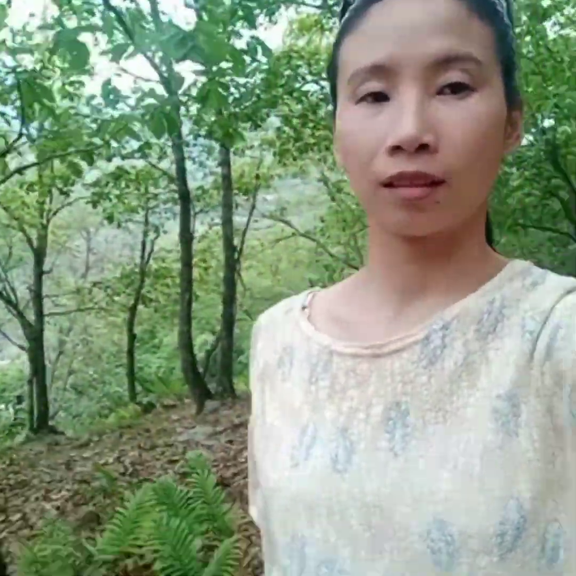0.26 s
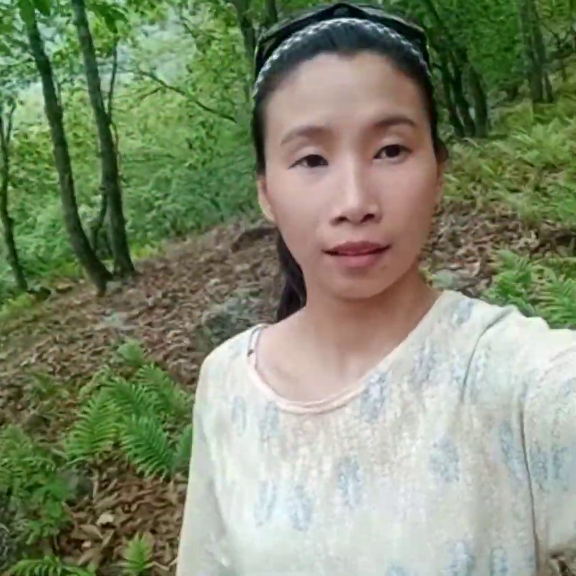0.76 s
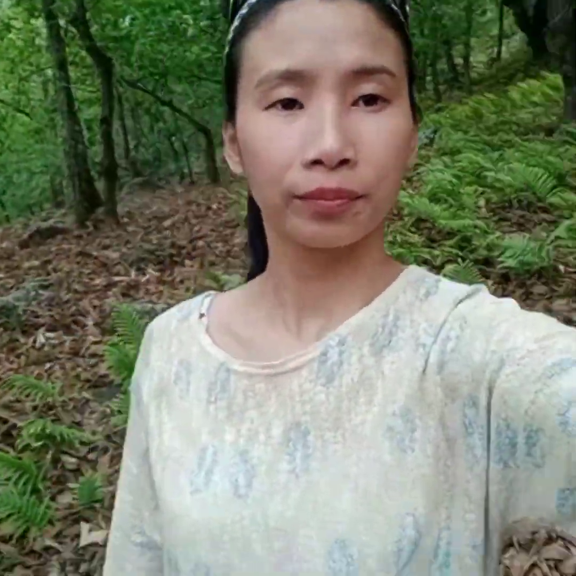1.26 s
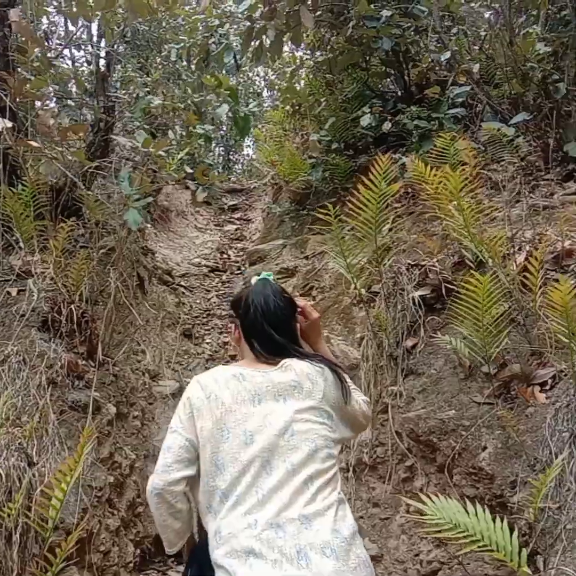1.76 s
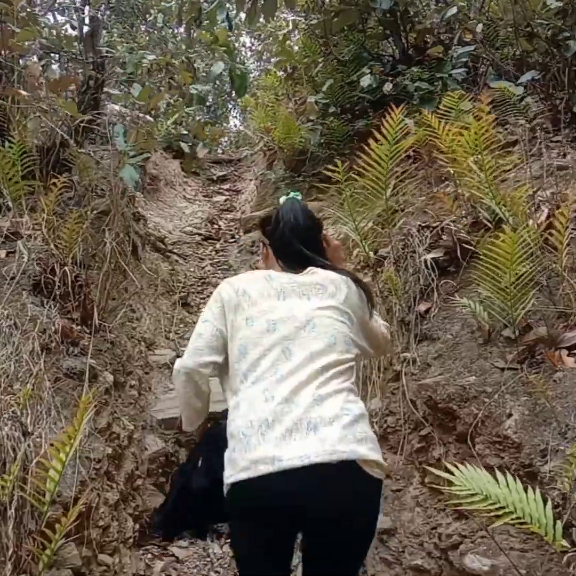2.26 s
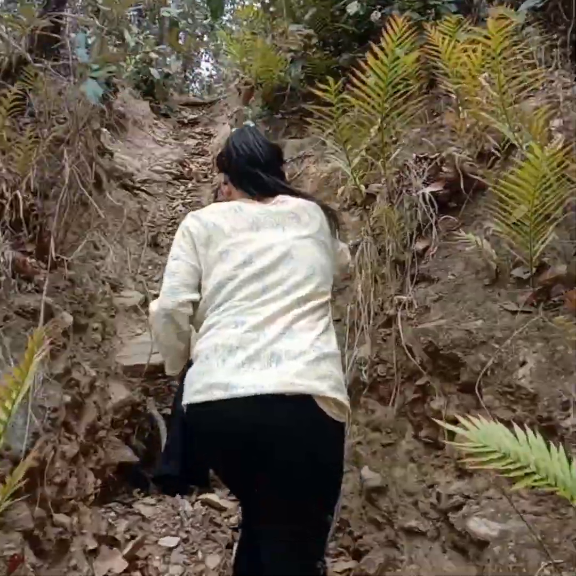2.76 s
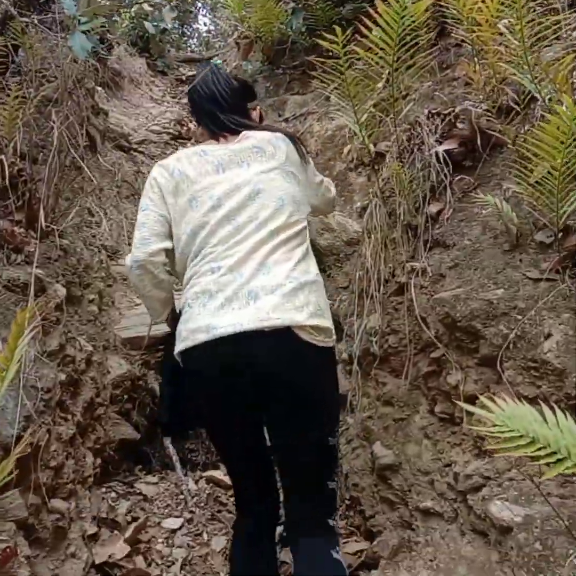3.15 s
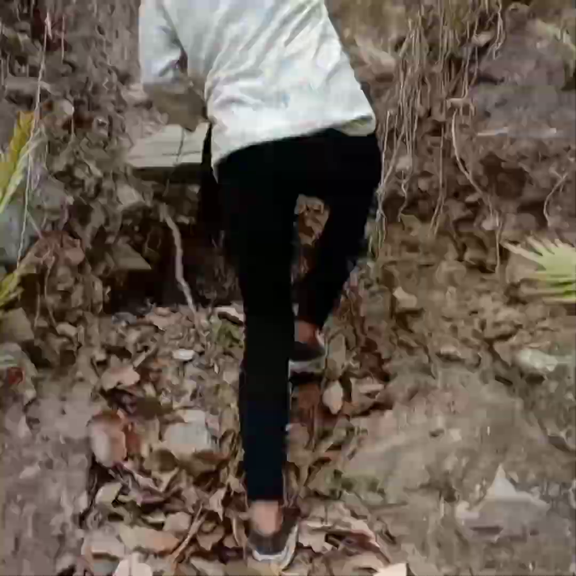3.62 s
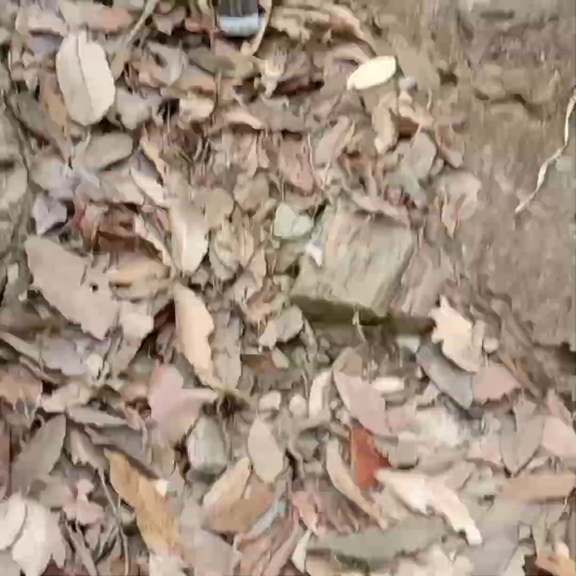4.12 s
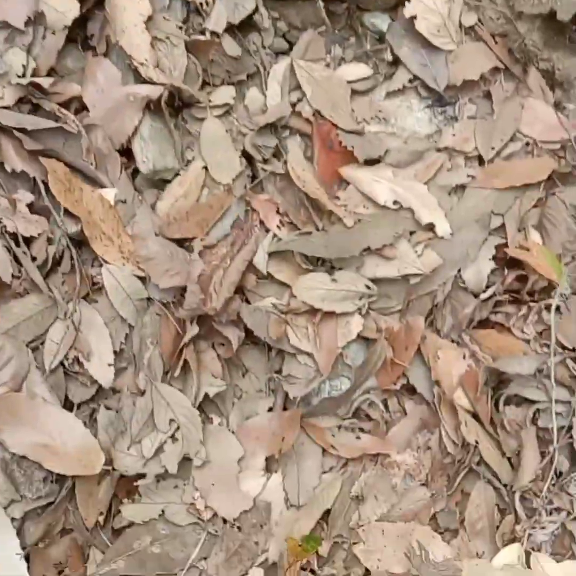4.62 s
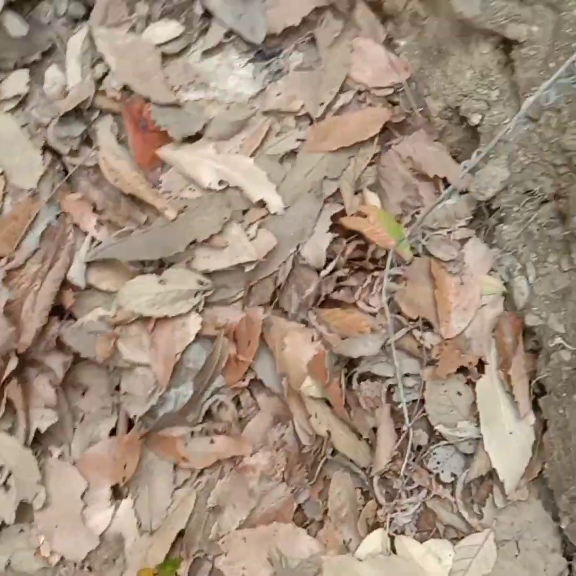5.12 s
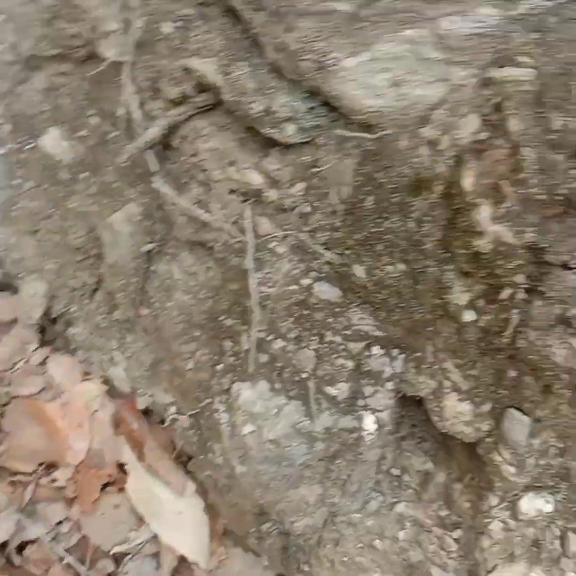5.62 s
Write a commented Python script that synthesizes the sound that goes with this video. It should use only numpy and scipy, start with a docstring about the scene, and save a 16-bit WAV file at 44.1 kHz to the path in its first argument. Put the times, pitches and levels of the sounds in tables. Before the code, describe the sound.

On a stony, leafy slope, each tread is a swarm of tiny dry cracks topped by single leaf snaps. After a momentary dropout the steps are faint, then crunchy again. Soft thuds bump the hand-held handset in the second half, its shell ringing dully over a faint lumpy rumble. Close, dry, mono sound.

```python
"""Feet crunch through dry leaves and grit on a stony hillside path, close to a hand-held mono microphone.
From the start each crush is a swarm of tiny cracks, and single leaves snap over it, hardest near 1.1 s.
The sound drops out for a moment after 1.7 s; quiet steps follow, and the crunch is full again by 2.4 s.
Low knocks, blows with a push of about one cycle, strike the handset, hardest near 3.7 s and again at 5.5 s.
Throughout, its shell rings near 1.3 kHz as the grit shakes it, over a lumpy low rumble of hand and ground."""
import sys
import numpy as np
from scipy import signal
from scipy.io import wavfile

SR = 44100
rng = np.random.default_rng(int(sys.argv[2]) if len(sys.argv) > 2 else 0)


def output_pcm(signal):
    """Save a mono or channel-first signal as 16-bit PCM at the path in sys.argv[1].

    Samples are clipped to [-1, 1] before scaling.
    """
    pcm = np.clip(np.atleast_2d(signal).T, -1, 1) * 32767
    wavfile.write(sys.argv[1], SR, np.round(pcm).astype(np.int16))


N = 259308

# leaves that give way at once: (time [s], crack peak [dB], centre [Hz])
LEAF_SNAPS = [(0.256, -32, 2300), (0.311, -23.5, 4100), (0.5022, -22.5, 3900), (0.611, -19, 3400),
              (1.0100, -19, 3670), (1.1453, -7.5, 4000), (1.2106, -23, 3990), (1.2200, -17.5, 4500),
              (1.2290, -16, 4750), (1.3815, -16, 2600), (1.4303, -13.5, 2970), (1.5747, -32, 2350),
              (1.856, -35.5, 10600), (2.318, -27, 5500), (2.419, -20, 3600), (2.609, -23, 4563),
              (2.7223, -23.5, 2080), (3.3677, -30, 3258), (3.6423, -17, 3103), (3.657, -19, 3300),
              (3.694, -19.5, 3010), (3.7255, -41, 3630), (3.7268, -20, 1942), (3.9286, -21, 4900),
              (4.0438, -18, 2850), (4.08, -19.5, 2650), (4.1070, -11.5, 5420), (4.1772, -15, 5500),
              (4.208, -19, 2900), (4.5533, -29, 2398), (4.5677, -21, 2380), (4.683, -24.5, 3223),
              (4.792, -15.5, 3240), (4.806, -17, 2700), (4.8199, -12, 2270), (5.0907, -30, 5030),
              (5.4277, -20.5, 3512), (5.5101, -22, 3320), (5.691, -30, 2670)]
# ringing modes of the handset's shell: (pitch [Hz], level [dB], 60 dB decay time [s])
SHELL_MODES = [(1270, -0.5, 0.031), (616, -6.5, 0.0081), (228, -15, 0.092)]


def from_db(db):
    """Amplitude factor of a level in dB."""
    return 10 ** (np.asarray(db) / 20)


def rms_one(x):
    """The signal scaled to an rms of 1."""
    return x / np.sqrt(np.mean(x ** 2) + 1e-20)


def at_hz(points, hz):
    """Level of a spectrum at one frequency, in straight lines over log frequency."""
    point_hz, point_db = np.array(points).T
    return np.interp(np.log(hz), np.log(point_hz), point_db)


def drift(rate_hz):
    """Slow chance: noise at every 20th sample through a double one-pole low-pass; rms 1."""
    r = np.exp(-2 * np.pi * rate_hz * 20 / SR)
    noise = rng.standard_normal(N // 20 + 2002)
    slow = signal.lfilter([1], [1, -2 * r, r * r], noise)[2000:]   # without the filter's start
    return np.interp(np.arange(N) / 20, np.arange(len(slow)), rms_one(slow))


def ring(clicks, hz, t60):
    """A resonance: a unit click sets off a decaying sine that starts at height 1."""
    r, w = from_db(-60 / (t60 * SR)), 2 * np.pi * hz / SR
    return signal.lfilter([0, np.sin(w)], [1, -2 * r * np.cos(w), r * r], clicks + 1e-18)


def crackle(per_s, spread_db, clumps_per_s, clump_s, calm):
    """Samples and signed sizes of tiny cracks, and their bustle: they swarm as a leaf gives, then thin out."""
    gives = (rng.random(N) < clumps_per_s / SR) * np.minimum(rng.exponential(1, N), 2)
    clumps = signal.lfilter([1], [1, -np.exp(-1 / (clump_s * SR))], gives)
    swarm = (calm + clumps) / (calm + clumps_per_s * clump_s)   # calm: the even share of the cracks
    at = np.flatnonzero(rng.random(N) < per_s * swarm / SR)
    sizes_db = spread_db * np.minimum(rng.exponential(1, len(at)), 3)
    sizes = from_db(sizes_db) * rng.choice([-1, 1], len(at))
    return at, sizes, rms_one(np.sqrt(swarm))


def coloured(cracks, spectrum, low_hz, high_hz, colour_db, hiss, patchy_db):
    """Narrow bands: every crack has a colour of its own, over noise that follows the bustle; rms 1."""
    at, sizes, bustle = cracks
    bands = round(5 * np.log2(high_hz / low_hz))
    edges = np.geomspace(low_hz, high_hz, bands + 1)
    out = 0
    for low, high in zip(edges, edges[1:]):
        push = np.zeros(N)
        push[at] = sizes * from_db(colour_db * rng.uniform(-0.7, 1, len(at)))
        push = rms_one(push) + hiss * bustle * rng.standard_normal(N)
        patches_db = patchy_db * (drift(21.3) + 1.2 * drift(2.6))
        gain = from_db(at_hz(spectrum, np.sqrt(low * high)) + patches_db)
        band = signal.butter(2, [low, high], "band", fs=SR, output="sos")
        out = out + gain * signal.sosfilt(band, push)
    return rms_one(out)


def tread(gains):
    """Feet in the litter: one stream of cracks drives the crunch, its treble, the grit and the shell."""
    # colour of the crushed leaves: (frequency [Hz], level [dB per Hz])
    leaves = [(300, -12), (500, -3.5), (1000, -7), (1600, -5), (2600, 3), (4500, 0), (7000, 0),
              (10000, -19), (13000, -41.5), (16000, -7)]
    tick_colour = [(4000, 6.0), (16000, -14)]   # (frequency [Hz], level [dB per Hz])
    ticks_db = -9.5   # lone twig and leaf-edge ticks, relative to the crisp band
    flutter_db, flutter_hz = 2, 18   # the grip on the shell comes and goes
    grip_db = 7.5   # rubbing of the hand on the shell, relative to the grit that shakes it

    body_gain, crunch_gain, grit_gain, ring_gain, brittle_gain, crisp_gain, fizz_gain = gains
    jump = np.hypot(1, crumbling() / crunch_gain)
    calm = 0.22 + 16.0 * crunch_gain   # a heavy crush is more even, its cracks less clumped
    cracks = crackle(per_s=3600.0, spread_db=4.0, clumps_per_s=110.0, clump_s=0.003, calm=calm)
    body = coloured(cracks, leaves, 1440, 2398, colour_db=4.5, hiss=0.43, patchy_db=2.0)
    crunch = coloured(cracks, leaves, 2313, 4970, colour_db=7.0, hiss=0.57, patchy_db=1.0)
    grit = coloured(cracks, leaves, 289.4, 1403, colour_db=3.5, hiss=0.74, patchy_db=3.5)
    brittle = coloured(cracks, leaves, 4940, 7480, colour_db=9.0, hiss=0.48, patchy_db=2.0)
    crisp = coloured(cracks, leaves, 7500, 13500, colour_db=27.0, hiss=0.96, patchy_db=3.0)
    fizz = coloured(cracks, leaves, 13500, 17000, colour_db=3.0, hiss=0.8, patchy_db=1.5)

    lone = crackle(per_s=39.0, spread_db=3.0, clumps_per_s=8.7, clump_s=0.045, calm=0.49)
    ticks = coloured(lone, tick_colour, 3524, 16500, colour_db=1.5, hiss=0.01, patchy_db=1.5)
    crisp_and_ticks = crisp + from_db(ticks_db) * ticks
    treble = brittle_gain * brittle + crisp_gain * crisp_and_ticks + fizz_gain * fizz
    litter = body_gain * body + crunch_gain * crunch + treble + grit_gain * grit

    bustle = cracks[2]
    rubbing = from_db(grip_db) * bustle * rng.standard_normal(N)
    flutter = from_db(flutter_db * drift(flutter_hz))
    shaking = ring_gain * flutter * (grit + rubbing)
    main_hz, _, main_t60 = SHELL_MODES[0]
    return jump * litter + ring(shaking, main_hz, main_t60)


def layers():
    """Gains of the layers: a foot's weight builds up, holds and settles, in dB, over the rest level."""
    # a foot crushes or drags the litter: (full weight at [s], held [s], build-up [s], settling [s],
    # crunch [dB], then relative to the crunch: grit [dB], shell drive [dB], brittle 5-8 kHz [dB],
    # crisp band above [dB])
    crushes = [(0.0, 0.06, .05, 0.13, -40.5, -26, -37.5, 0.5, -4.5),
               (.27, 0.051, 0.079, 0.18, -45.5, -32, -39, -3, -13),
               (0.384, 0.025, 0.097, 0.056, -36, -23, -41.5, 4, 2),
               (.505, 0.022, 0.18, 0.13, -40.5, -43, -45, 0, -6),
               (0.617, 0.043, 0.13, 0.11, -33, -28, -40.5, 2, 1),
               (1.011, 0.031, 0.016, 0.078, -35.5, -15, -54.5, -1, -2),
               (1.057, 0.129, 0.061, 0.06, -27, -17, -42, -1, -1),
               (1.253, 0.05, 0.06, 0.12, -29, -15.5, -40, 0, -1),
               (1.383, 0.08, 0.074, .12, -25.5, -21, -49, -0.5, -4.5),
               (1.58, 0.16, 0.02, 0.016, -29.5, -20, -43, 0, -4.5),
               (2.1, 0.036, 0.15, 0.089, -54.5, -4, -29, 7.5, -7),
               (2.229, 0.0078, 0.12, 0.088, -55, -6, -23.5, 11, -17),
               (2.37, 0.03, 0.1135, 0.12, -39.5, -13, -46, 0, -1),
               (2.43, 0.04, 0.047, 0.085, -32.5, -5.5, -34.5, 0.5, 0.5),
               (2.625, 0.03, 0.11, 0.15, -35.5, -6.5, -30.5, 3.5, -2.5),
               (2.82, 0.032, 0.19, 0.084, -43.5, -18, -28.5, -1.5, -9),
               (3.002, 0.044, 0.34, 0.17, -43, -16, -31, -0.5, -6),
               (3.195, 0.044, 0.053, 0.11, -52, -21.5, -23.5, 12, -2),
               (3.43, 0.062, 0.074, 0.22, -33, -11.5, -37.5, -0.5, -5.5),
               (3.646, 0.054, 0.099, 0.027, -34.5, -6, -40, 0.5, -6.5),
               (3.809, 0.06, 0.067, 0.083, -34.5, -8, -32, -1.5, -4.5),
               (3.932, 0.095, 0.084, 0.039, -38, -2, -31, -1.5, -6.5),
               (4.06, 0.16, 0.052, 0.023, -33.5, -19, -41.5, 2.5, -3.5),
               (4.27, 0.114, 0.58, 0.12, -40.5, -35, -49.5, -1, -12),
               (4.42, .17, 0.25, 0.15, -35, -33, -41.5, -5.5, -7),
               (4.7, 0.041, 0.063, 0.063, -37, -17, -48, -8.5, -14),
               (4.792, .04, 0.034, 0.095, -28, -10.5, -40.5, -4.5, -10),
               (4.95, 0.089, 0.22, 0.072, -42.5, -15, -37, -5.5, -11),
               (5.09, 0.04, 0.25, 0.14, -39.5, -8, -37, -0.5, -9),
               (5.2, 0.027, 0.018, 0.033, -46.5, -2, -24.5, -16, -2.5),
               (5.428, 0.0052, 0.022, 0.048, -37, -10, -58, -14, -1.5),
               (5.54, 0.055, 0.081, 0.04, -48, 5, -41, -18, 0.5),
               (5.69, 0.08, 0.11, 0.097, -44, -8.5, -43, -25, 2.5),
               (5.784, 0.037, 0.11, 0.13, -32, -14.5, -41.5, -8.5, 1),
               (5.84, .05, 0.095, .1, -30, -8.5, -30, -4, -2.5)]
    # stretches of the walk: (from [s], then between the steps: body [dB], crunch [dB], grit [dB],
    # shell drive [dB], brittle [dB], crisp [dB], fizz [dB], rumble [dB],
    # then in a crush: body re crunch [dB], fizz re crisp [dB], rumble re grit [dB])
    stretches = np.array([(0, -60, -60, -69.5, -90, -59.5, -68, -85, -62.5, -5, -18, -27),
                          (1.75, -65, -62, -71, -89.5, -58.5, -57, -72, -71.5, -3, -8, 6.5),
                          (2.3, -55, -59.5, -57, -84, -58, -50.5, -79.5, -59.5, -5, -17, -16),
                          (4.87, -62, -60, -64, -76, -72, -73, -76, -57, -4.5, -20, 3.5),
                          (5.26, -61, -61, -67.5, -95.5, -68, -64, -77, -62.5, -4, -30, -5.5)])
    swing_db = 23   # rise over one build-up time, fall over one settling time
    treble_quicker = 1.29   # the top bands come and go faster
    body_thins = 0.053   # the lower crunch (1.4-2.4 kHz) loses this much per dB of brittleness

    t = np.arange(0, N + 64, 64) / SR
    columns = np.transpose(crushes)[:, :, None]
    s, held, build, settle, crunch, grit, ring_db, brittle, crisp = columns
    stretch = np.searchsorted(stretches[:, 0], t, "right") - 1
    _, *rest_db, body, fizz, thump = stretches[stretch].T
    before, after = np.maximum(s - t, 0), np.maximum(t - s - held, 0)
    loss = swing_db * (before / build + after / settle)
    weight = crunch - loss
    top = crunch + crisp - treble_quicker * loss
    crushed_db = [weight + body - body_thins * brittle, weight, weight + grit, weight + ring_db,
                  weight + brittle, top, top + fizz, weight + grit + thump]
    gains = []
    for rest, crushed in zip(rest_db, crushed_db):
        power = from_db(rest) ** 2 + np.sum(from_db(crushed) ** 2, axis=0)
        gains.append(np.interp(np.arange(N) / SR, t, np.sqrt(power)))
    return gains


def crumbling():
    """After each snap the crackle jumps up at once and dies away as the leaf crumbles; gain."""
    under_snap_db, t60 = -26, 0.012   # level relative to the snap's peak, 60 dB decay time in s
    out, t = np.zeros(N), np.arange(N) / SR
    for s, db, _ in LEAF_SNAPS:
        decay_db = -60 * np.maximum(t - s, 0) / t60
        out += from_db(db + under_snap_db + decay_db) * (t >= s)
    return out


def snaps():
    """A leaf breaks: a burst of noise a few ms long, ringing broadly at its own pitch."""
    out, t = np.zeros(N + 2000), np.arange(2000) / SR
    noise = np.diff(rng.standard_normal((len(LEAF_SNAPS), 2001)))   # differencing brightens it
    for (s, db, hz), burst in zip(LEAF_SNAPS, noise):
        burst = burst * from_db(-60 * t / 0.013) * np.minimum(1, t / 0.0007)
        crack = ring(burst, hz, 9.5 / hz) + 0.05 * burst
        out[round(s * SR):][:2000] += from_db(db) * crack / np.max(np.abs(crack))
    return out[:N]


def knocks():
    """Soft blows: a low push of about one cycle strikes the shell; the sound, and the scuffing gain after it."""
    # knocks through the handset: (time [s], push peak [dB], push pitch [Hz], strike on the shell [dB])
    blows = [(1.144, -40.5, 78.47, -35), (2.215, -41.5, 151, -43), (2.684, -60, 503.4, -26.5),
             (3.7269, -4.5, 212.6, -11), (3.783, -26.5, 86.9, -34), (3.811, -30.5, 189, -26),
             (3.959, -24.5, 131.1, -43), (3.977, -23.5, 137, -28), (3.992, -21, 134.9, -25),
             (4.009, -13.5, 117, -19.5), (4.1075, -56, 400, -24.5), (4.167, -45, 902, -25.5),
             (4.192, -46, 898, -31), (4.724, -22.5, 125, -50.5), (4.802, -23, 90, -40),
             (4.8686, -42, 171, -23.5), (4.914, -27.5, 393, -21.5), (5.104, -25, 290, -30.5),
             (5.2048, -37, 499, -27.5), (5.5114, -9.5, 644, -14), (5.557, -27.5, 202, -32),
             (5.582, -29.5, 82.8, -32)]
    out, scuff, t = np.zeros(N + 4000), np.zeros(N + 4000), np.arange(4000) / SR
    struck, pitch = np.zeros(N), np.ones(N)
    for s, db, hz, ring_db in blows:
        start = round(s * SR)
        cycles = t * hz
        sagging = np.sin(2 * np.pi * cycles ** 0.83)   # the pitch sags as the contact spreads
        push = sagging * cycles ** 1.74 * from_db(-60 * cycles / 1.78)
        out[start:][:4000] += from_db(db) * push / np.max(np.abs(push))
        scuff[start:][:4000] += from_db(db - 11 - 60 * cycles / 9.8)
        struck[start + 30] = from_db(ring_db)   # 30 samples into the push
        pitch[start + 30] = hz
    return out[:N] + shell(struck, pitch), scuff[:N]


def shell(strikes, push_hz):
    """The handset's shell rings in all its modes; a quick blow hardly moves the modes below its pitch."""
    out = 0
    for hz, db, t60 in SHELL_MODES:
        moved = strikes * np.minimum(1, hz / push_hz) ** 2
        out = out + from_db(db) * ring(moved, hz, t60)
    return out


def rumble(gain):
    """Lumpy low noise from the hand and the ground: clumped cracks in bands below 422 Hz."""
    # rumble colour: (frequency [Hz], level [dB per Hz])
    ground = [(32, -59), (51, -6.5), (113, 5.5), (249, 2.5), (400, -7), (520, -32), (880, -120)]
    lumps = crackle(per_s=430.0, spread_db=2.5, clumps_per_s=15.0, clump_s=0.037, calm=0.35)
    return gain * coloured(lumps, ground, 24.64, 421.3, colour_db=3.0, hiss=0.15, patchy_db=-0.5)


def scene():
    """Tread, snaps, knocks and rumble, alike in both channels; every knock stirs up the rumble."""
    *tread_gains, rumble_gain = layers()
    blows, scuff = knocks()
    mono = tread(tread_gains) + snaps() + blows + rumble(rumble_gain + scuff)
    return np.stack([mono, mono])


def record(dry):
    """The capsule drops the deep bass, the port colours the treble, the sound drops out, the top is cut."""
    # microphone port: (centre [Hz], width [Hz], gain before the drop-out ends [dB], gain after it [dB])
    port = [(8110, 3680, -22, -17.5), (15100, 470, 7, 12), (4530, 820, -0.5, -4.5), (6200, 410, -4.5, -9)]
    # the moment without sound: (silent from about [s], returning from [s])
    off, on = (1.729, 1.772)
    cutoff_hz = 16150
    t = np.arange(N) / SR
    x = signal.sosfilt(signal.butter(3, 60.0, "high", fs=SR, output="sos"), dry)
    for hz, width_hz, first_db, later_db in port:
        db = np.where(np.arange(N) < on * SR, first_db, later_db)
        r = np.exp(-np.pi * width_hz / SR)
        poles = [1, -2 * r * np.cos(2 * np.pi * hz / SR), r * r]
        peak = signal.lfilter([(1 - r * r) / 2, 0, (r * r - 1) / 2], poles, x)
        x = x + (from_db(db) - 1) * peak
    x = x * np.interp(t, [off, off + 0.00031, on, on + 0.021], [1, 0, 0, 1])
    return signal.sosfilt(signal.cheby2(16, 80, cutoff_hz, fs=SR, output="sos"), x)


dry = scene()
out = record(dry)
output_pcm(out)
```